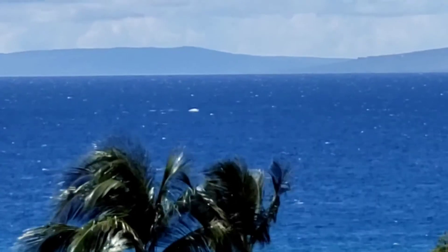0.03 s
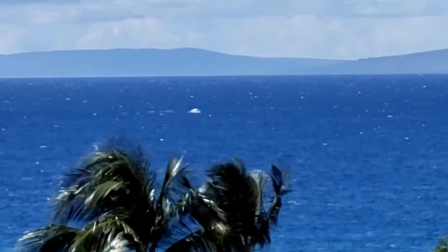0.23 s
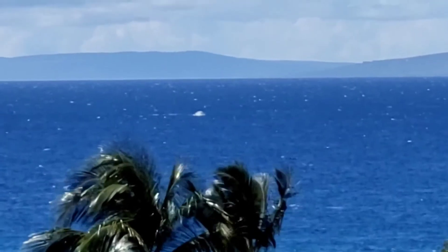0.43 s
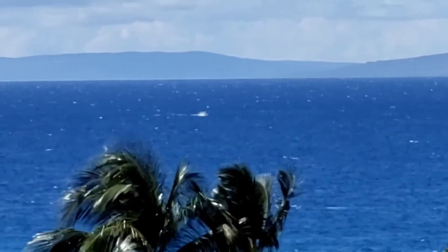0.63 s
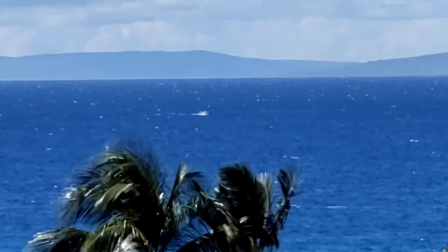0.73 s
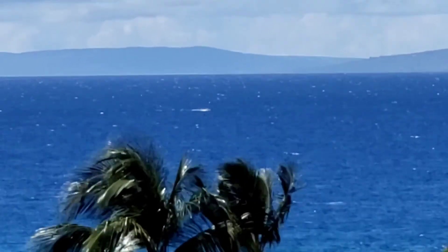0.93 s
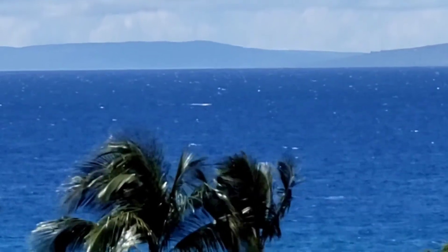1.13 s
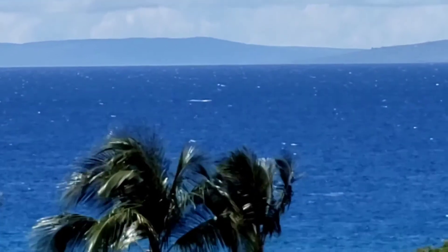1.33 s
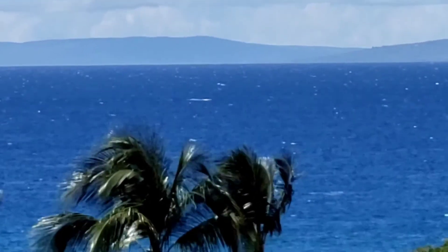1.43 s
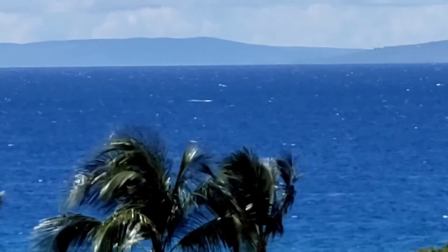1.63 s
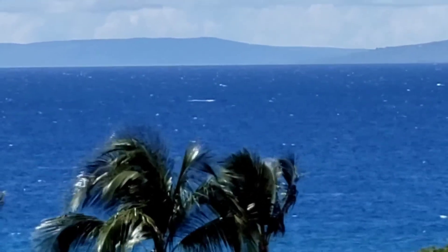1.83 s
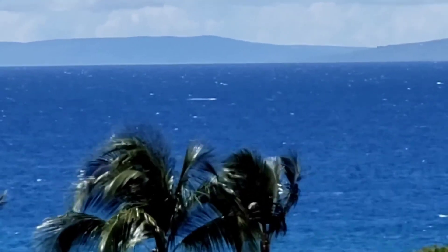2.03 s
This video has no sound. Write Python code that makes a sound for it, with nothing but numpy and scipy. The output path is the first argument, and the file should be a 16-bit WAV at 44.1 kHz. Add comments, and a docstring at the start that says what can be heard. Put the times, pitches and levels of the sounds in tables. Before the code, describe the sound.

Wind buffeting on a small stereo microphone outdoors by the sea. It opens as a soft low rumble; from 0.2 seconds deep, irregular thumps strike left and right, hardest near 0.6, continuing to about 1.1, then thinning, with a brief return around 1.55 and a quieter end by 2.1. Throughout, steady hiss of palms and distant surf, thin high sizzle, and faint, hoarse, quick bird chirps, one clearer near 1.83.

```python
"""First comes a soft low rumble of wind over a steady hiss, with small birds already chirping.
The wind on this coast is gusty: eddies thump the two ports of a small camera, each on its own, as short
low sine bursts with a rasp of noise. Palms and far surf are shaped stereo noise, and a thin sizzle of noise
flickers above them. The distant birds are gliding, hoarse sines smeared by echoes off the trees."""
import sys
import numpy as np
from scipy import signal
from scipy.fft import rfft, irfft
from scipy.io import wavfile
from scipy.ndimage import uniform_filter1d, map_coordinates

SR = 44100
rng = np.random.default_rng(int(sys.argv[2]) if len(sys.argv) > 2 else 0)


def bounce(signal):
    """Save signal as a 16-bit WAV file at the path given by the first command-line argument."""
    frames = np.transpose(np.atleast_2d(signal))
    limited = np.clip(frames, -1, 1)
    pcm = np.round(limited * 32767).astype(np.int16)
    wavfile.write(sys.argv[1], SR, pcm)


def rack_gain(trim_db):
    """Turn a fader trim in dB into the linear factor to multiply a signal by."""
    fader = np.asarray(trim_db, float)
    return 10 ** (fader / 20)


N = 92610  # samples, 2.1 s


def unit(x):
    """Scale to rms 1."""
    return x / np.sqrt(np.mean(x ** 2) + 1e-20)


def along(points, hz):
    """Read a curve of (Hz, value) points on a log frequency axis."""
    point_hz, value = np.transpose(points)
    return np.interp(np.log(hz + 1), np.log(point_hz + 1), value)


def curves(rows):
    """One value per sample for each column after the time."""
    s, *columns = np.transpose(rows)
    return np.array([np.interp(np.arange(N) / SR, s, column) for column in columns])


def wobble(rate):
    """A smooth random curve through normal-distributed knots, rate knots a second."""
    return map_coordinates(rng.standard_normal(1200), [np.arange(N) * rate / SR])


def rush(spectrum, alike, patchy_db):
    """Stereo noise of rms 1: random gain patches in time and pitch, a spectrum, a left-right likeness."""
    grains = signal.stft(rng.standard_normal((2, N + 8192)), nperseg=512)[2]
    patches = uniform_filter1d(rng.standard_normal(grains.shape[1:]), size=6, axis=0)  # over pitch
    patches = uniform_filter1d(patches, size=12, axis=1)  # over time
    pair = signal.istft(grains * rack_gain(patchy_db * unit(patches)), nperseg=512)[1]
    hz = np.fft.rfftfreq(pair.shape[1], 1 / SR)
    # likeness 1 is all mid, -1 all side, 0 an equal share of both
    turn = np.arccos(np.clip(along(alike, hz), -1, 1)) / 2
    shaped = rfft(pair) * rack_gain(along(spectrum, hz)) * [np.cos(turn), np.sin(turn)]
    mid, side = irfft(shaped, pair.shape[1])[:, :N]
    return unit(np.array([mid + side, mid - side]))


# Single eddies striking one port; length is the width of the swell between its 1/e points:
# start_s (moment of the peak) [s], level_db (swell peak) [dB], pitch_hz [Hz], length_s [s],
# rasp_db (rasp over thump) [dB], port [-1 left, 1 right]
EDDIES = [(0.05, -38, 169, 0.022, -8, -1), (0.125, -43, 68, 0.021, -27, -1),
          (0.154, -46.5, 93, 0.028, -3, 1), (0.213, -29, 69.5, 0.041, -27, 1),
          (0.245, -14.5, 89, 0.013, -15.5, 1), (0.246, -15.5, 90, 0.012, -24.5, -1),
          (0.295, -23.5, 67.7, 0.079, -8, -1), (0.3, -30, 127.4, 0.032, -3.5, 1),
          (0.385, -27, 94, 0.013, -13, -1), (0.413, -36, 97, 0.029, -2.5, 1),
          (0.416, -22.5, 79, 0.025, -19, -1), (0.501, -20.5, 91.6, 0.013, -55, -1),
          (0.526, -24.5, 104.2, 0.057, -45, -1), (0.57, -25, 69, 0.026, -6, 1),
          (0.5855, -9, 111, 0.006, -30, 1), (0.5855, -11.5, 113, 0.01, -14, -1),
          (0.598, -23, 123, 0.012, -9, 1), (0.619, -21.5, 73.5, 0.019, -17, 1),
          (0.668, -23, 55, 0.012, -30, -1), (0.654, -26.5, 70, 0.0092, -30, 1),
          (0.69, -15, 69, 0.04, -14, 1), (0.698, -18.5, 65, 0.029, -11, -1),
          (0.743, -20.5, 108, 0.018, -19.5, 1), (0.781, -28, 86, 0.036, -36, 1),
          (0.796, -34, 100, 0.024, -15.5, -1), (0.833, -38.5, 63, 0.05, -36, 1),
          (0.92, -30.5, 129, 0.033, -45, 1), (0.97, -22.5, 95, 0.017, -9, -1),
          (0.968, -19.5, 92.6, 0.021, -21.5, 1), (0.999, -23.5, 85.4, 0.031, -19, -1),
          (1.006, -21.5, 82.7, 0.028, -34, 1), (1.064, -20, 67, 0.025, -30, 1),
          (1.065, -21.5, 65, 0.028, -32, -1), (1.1, -49, 60, 0.035, -33, -1),
          (1.102, -24.5, 75, 0.0056, -48, 1), (1.144, -29.5, 73, 0.01, -45, -1),
          (1.202, -32.5, 78, 0.0096, -21, 1), (1.242, -37, 61.5, 0.057, -23.5, -1),
          (1.243, -32, 63, 0.0048, -38, 1), (1.333, -50, 59, 0.024, -11, -1),
          (1.334, -40.5, 84, 0.0092, -18, 1), (1.355, -42.5, 102, 0.0075, -11, -1),
          (1.356, -50, 71, 0.063, -7, 1), (1.477, -32.5, 108, 0.0064, -34, -1),
          (1.534, -33.5, 340, 0.013, -22, 1), (1.546, -21.5, 76.3, 0.046, -22, -1),
          (1.567, -37, 89, 0.014, -16, -1), (1.565, -31, 84.5, 0.015, -20, 1),
          (1.591, -28, 76.5, 0.018, -16.5, 1), (1.63, -29.5, 62.6, 0.047, -20, 1),
          (1.639, -33, 81, 0.013, -13.5, -1), (1.709, -39.5, 74, 0.019, -29, 1),
          (1.807, -41, 104, 0.014, -25, 1), (1.851, -37, 85, 0.018, -34, 1),
          (1.889, -41.5, 68.6, 0.023, -32, 1)]


def eddies():
    """Each eddy presses on a port as a short low sine in a bell-shaped swell; returns thumps and rasp gain."""
    t = np.arange(N) / SR
    phase_spread_rad, wander_rad = 0.2, 0.4
    rasp_power = 0.7  # below 1: the rasp swells for longer than the thump
    thump, rasp_gain = np.zeros((2, N)), np.zeros((2, N))
    wander = wander_rad * np.array([wobble(90), wobble(90)])
    phases = phase_spread_rad * rng.normal(0, 1, len(EDDIES))
    for (s, db, hz, length, rasp_db, port), phase in zip(EDDIES, phases):
        side = int(port > 0)
        swell = np.exp(-((t - s) / (0.5 * length)) ** 2)
        thump[side] += rack_gain(db) * swell * np.sin(2 * np.pi * hz * (s - t) + wander[side] + phase)
        rasp_gain[side] += rack_gain(db + rasp_db) * swell ** rasp_power
    return thump, rasp_gain


# Turbulence at each port, before flutter: start_s [s], left_level_db [dB], right_level_db [dB]
GUSTS = [(0, -51, -47.5), (0.12, -43.5, -49), (0.2, -59, -44.5), (0.3, -32, -28.5), (0.45, -39.5, -41.5),
         (0.6, -34, -42), (0.75, -46, -36), (0.86, -80, -48.5), (0.93, -43, -27), (1.05, -34.5, -29.5),
         (1.2, -58, -47.5), (1.3, -47.5, -55.5), (1.42, -73, -48), (1.55, -32.5, -56), (1.66, -79, -58.5),
         (1.78, -58, -46.5), (1.87, -70, -42), (1.96, -82, -56.5), (2.09, -96, -50)]
# Spectrum of the low turbulence: pitch_hz [Hz], level_db [relative dB per Hz]
RUMBLE_SPECTRUM = [(15, -45.5), (30, 6.5), (70, 4.5), (120, -2), (200, -1.5), (350, -22), (600, -69),
                   (2500, -120)]
# Spectrum of the coarser noise in the eddies: pitch_hz [Hz], level_db [relative dB per Hz]
RASP_SPECTRUM = [(60, -34), (120, 2), (170, 2), (260, -4.5), (400, -7.5), (700, -27.5), (1200, -70),
                 (3000, -120)]


def buffeting():
    """Turbulence flutters at each port as independent low noise; eddies add thumps and bursts of rasp."""
    flutter_db = 3.5 * np.array([wobble(35.2), wobble(34.56)])
    gust_gain = rack_gain(curves(GUSTS) + flutter_db)
    thump, eddy_rasp_gain = eddies()
    rasp_gain = gust_gain * rack_gain(-15.0) + eddy_rasp_gain  # a little rasp rides on every gust
    apart = [(100, 0)]  # no likeness between the ports at any pitch
    rumble = gust_gain * rush(RUMBLE_SPECTRUM, apart, patchy_db=4)
    rasp = rasp_gain * rush(RASP_SPECTRUM, apart, patchy_db=0.5)
    return thump + rumble + rasp


# Spectrum of palms and surf, before lean and swell: pitch_hz [Hz], level_db [relative dB per Hz]
HISS_SPECTRUM = [(100, -44.5), (200, -14), (300, -2), (420, -2.5), (530, -5.5), (780, -1), (1050, -3.5),
                 (1500, -8), (2200, -16), (3100, -24), (4200, -16.5), (5500, -20.5), (7000, -27),
                 (7800, -36), (8000, -45.5), (8300, -58), (10000, -120)]
# Left-right likeness of the hiss: pitch_hz [Hz], likeness [correlation, -1 to 1]
HISS_LIKENESS = [(250, 1), (500, 0.3), (750, 0.68), (1000, -0.67), (1300, -0.46), (1800, -0.23),
                 (3000, 0.31), (9000, -0.54)]
# Stereo lean of the hiss: pitch_hz [Hz], left_over_right_db [dB]
HISS_LEAN = [(150, -15), (250, 1), (400, 0), (2300, -1), (4100, -1.5), (6000, 7.5), (7600, 25.5)]
# Swell of the lower hiss on its own: start_s [s], low_over_high_db [dB]
HISS_LOW_SWELL = [(0, 7), (0.12, 6), (0.3, 0.5), (0.75, 1), (1.1, 0), (1.7, 0)]
# Gain of the whole hiss: start_s [s], level_db [dB]
HISS_GAIN = [(0.0, -54.5), (0.19, -52.5), (0.51, -53.5), (1.03, -53), (1.5, -53), (2.1, -54.5)]


def palms():
    """Far leaves and surf blur into a smooth noise that breathes slightly, its low part swelling by itself."""
    hz = np.fft.rfftfreq(N, 1 / SR)
    lean_db = along(HISS_LEAN, hz) * [[0.5], [-0.5]]  # half up on the left, half down on the right
    hiss = rfft(rush(HISS_SPECTRUM, HISS_LIKENESS, patchy_db=1.3)) * rack_gain(lean_db)
    low_share = 1 / (1 + (hz / 1300) ** 2)  # crossover at 1300 Hz
    low = irfft(hiss * low_share, N)
    high = irfft(hiss * (1 - low_share), N)
    return rack_gain(curves(HISS_GAIN)) * (rack_gain(curves(HISS_LOW_SWELL)) * low + high)


# Bird whistles, level before quaver and haze:
# start_s [s], length_s [s], start_pitch_hz [Hz], end_pitch_hz [Hz], level_db [dB]
WHISTLES = [(0.0, 0.067, 4530, 4650, -66.5), (0.0, 0.018, 4280, 4310, -56), (0.043, 0.043, 3720, 4060, -54),
            (0.079, 0.055, 3730, 4100, -61), (0.165, 0.065, 5100, 4840, -67.5),
            (0.194, 0.056, 4104, 3860, -61), (0.126, 0.052, 3900, 3900, -69),
            (0.516, 0.028, 4560, 4540, -63.5), (0.343, 0.071, 6990, 6920, -58.5),
            (0.35, 0.055, 7450, 7500, -65), (0.37, 0.035, 5460, 5200, -57),
            (0.393, 0.025, 5570, 5400, -55.5), (0.383, 0.061, 5070, 4780, -53.5),
            (0.433, 0.035, 5120, 4870, -59), (0.452, 0.069, 4866, 4620, -52.5),
            (0.6, 0.052, 5160, 4820, -59), (0.667, 0.053, 5770, 5600, -64.5), (0.688, .03, 6300, 6000, -61),
            (0.722, 0.076, 5610, 5380, -65.5), (0.694, 0.079, 5200, 5060, -58.5),
            (0.76, 0.048, 5250, 4840, -63), (0.789, 0.075, 4410, 4260, -64),
            (0.912, 0.043, 4170, 4000, -62), (0.964, 0.12, 4040, 4066, -65.5),
            (0.96, 0.084, 3710, 3500, -64), (1.062, 0.027, 2780, 3200, -64),
            (1.103, 0.12, 4580, 4040, -65.5), (1.138, 0.055, 5280, 4880, -69), (1.24, .07, 4300, 4150, -57),
            (1.27, 0.0474, 4150, 3760, -62), (1.286, 0.07, 4200, 3766, -59),
            (1.4, 0.032, 3900, 3850, -62.5), (1.457, 0.09, 5970, 5650, -66.5),
            (1.485, 0.026, 5350, 5130, -63.5), (1.537, 0.1, 5123, 4760, -61.5),
            (1.478, 0.12, 4020, 3890, -75), (1.76, 0.075, 5500, 5710, -66), (1.801, 0.038, 4360, 4100, -60),
            (1.827, 0.041, 4473, 3996, -50), (1.855, 0.049, 4430, 3920, -58.5),
            (1.945, 0.032, 4700, 4460, -64), (1.951, 0.051, 4070, 4000, -64.5),
            (1.996, 0.047, 4180, 3906, -60.5), (2.046, 0.049, 3870, 3900, -65)]


def whistles():
    """Each chirp is a gliding, warbling sine with a second, more unsteady sine as a hoarse haze round it."""
    warble_hz, warble_rate = 80, 220  # Hz, knots per second
    husk_hz, husk_rate, husk_db = 300, 500, -6  # Hz, knots per second, dB against the whistle
    quaver_db, quaver_rate = 3, 75  # dB, knots per second
    edge = 0.33  # share of the length spent swelling, and again fading
    t, song = np.arange(N) / SR, np.zeros(N)
    for s, length, start_hz, end_hz, db in WHISTLES:
        span = slice(max(round(s * SR), 0), round((s + length) * SR))
        u = t[span] - s
        gate = np.clip(np.minimum(u, length - u) / (edge * length), 0, 1)
        glide = start_hz + (end_hz - start_hz) * u / length
        pitch = glide + warble_hz * wobble(warble_rate)[:len(u)]
        husk_pitch = pitch + husk_hz * wobble(husk_rate)[:len(u)]
        voice = np.sin(2 * np.pi * np.cumsum(pitch) / SR)
        husk = rack_gain(husk_db) * np.sin(2 * np.pi * np.cumsum(husk_pitch) / SR)
        quaver = quaver_db * wobble(quaver_rate)[:len(u)]
        song[span] += rack_gain(db + quaver) * gate * (voice + husk)
    return song


def birds():
    """Whistles reach the left port slightly first; a decaying noise tail smears them like echoes off trees."""
    t60_s, echo_db, lag_s = 0.22, -2, 0.00021
    song = whistles()
    t = np.arange(SR // 2) / SR
    tail = rng.standard_normal((2, SR // 2)) * rack_gain(-60 * t / t60_s)
    echo = signal.fftconvolve(song[None], tail / np.linalg.norm(tail[0]), axes=1)[:, :N]
    # left half the lag early, right half the lag late
    lag = np.exp(1j * np.pi * np.fft.rfftfreq(N, 1 / SR) * lag_s * np.array([[1], [-1]]))
    return irfft(rfft(song) * lag, N) + rack_gain(echo_db) * echo


# Spectrum of the thin hiss above the palms: pitch_hz [Hz], level_db [relative dB per Hz]
SIZZLE_SPECTRUM = [(7000, -120), (8300, -20.5), (9200, -8.5), (10000, -11), (11200, -6), (12000, -5),
                   (14600, -7)]
# Sizzle level before flicker, one row for left and one for right: level_db [dB]
SIZZLE_LEVEL = [
    [-79],
    [-74],
]


def sizzle():
    """Thin, patchy high noise that flickers on each side on its own."""
    flicker_db = 0.83 * np.array([wobble(14), wobble(12.0)])
    return rack_gain(SIZZLE_LEVEL + flicker_db) * rush(SIZZLE_SPECTRUM, [(9000, 0)], patchy_db=4.5)


def scene():
    """Wind at the ports over palms, birds and sizzle."""
    return buffeting() + palms() + birds() + sizzle()


def top_cut(x):
    """Nothing passes above the cut-off."""
    return signal.sosfilt(signal.butter(12, 14500, fs=SR, output="sos"), x)


def record(dry):
    """The strongest thumps round off smoothly towards a ceiling."""
    ceiling = 0.36  # of full scale
    rounded = dry / (1 + np.abs(dry / ceiling) ** 4) ** (1 / 4)
    return top_cut(rounded)


dry = scene()
out = record(dry)
bounce(out)
```